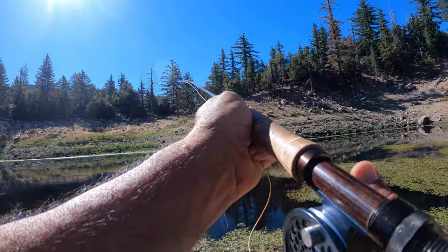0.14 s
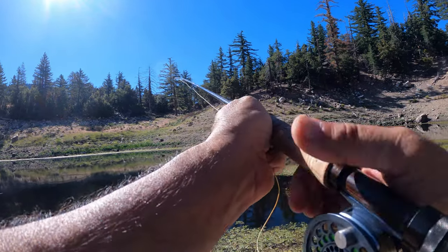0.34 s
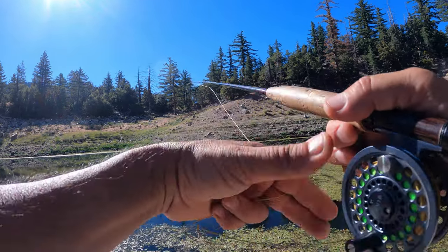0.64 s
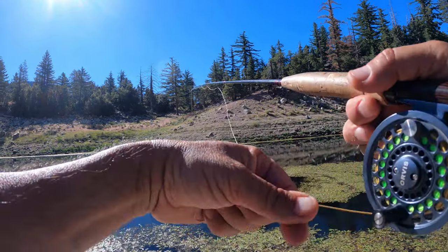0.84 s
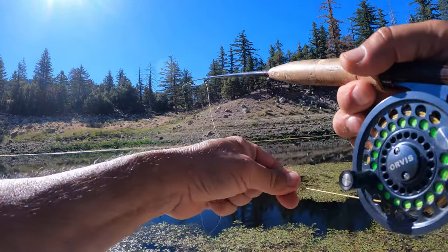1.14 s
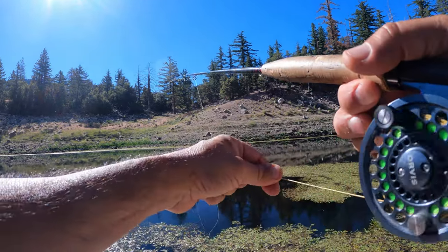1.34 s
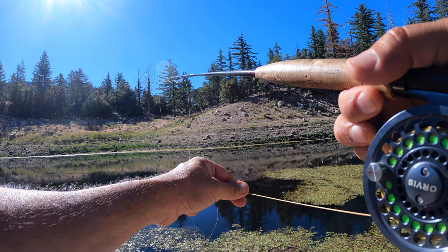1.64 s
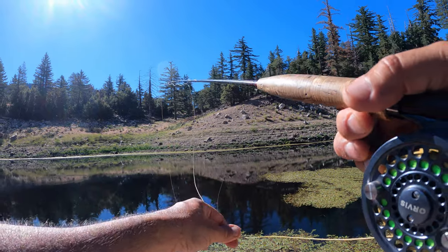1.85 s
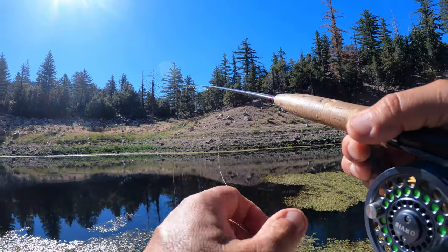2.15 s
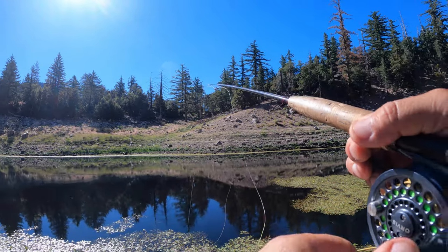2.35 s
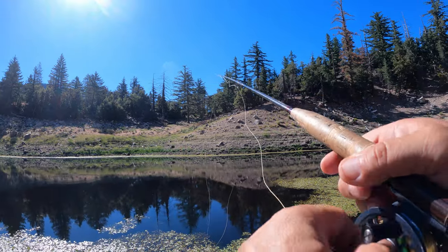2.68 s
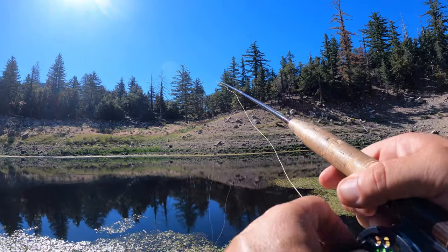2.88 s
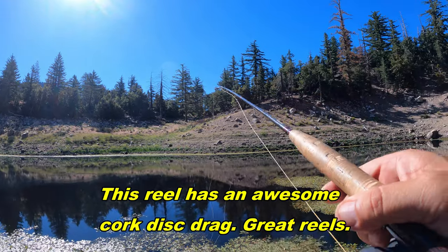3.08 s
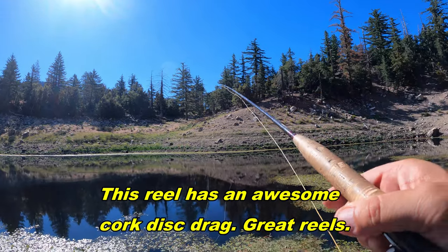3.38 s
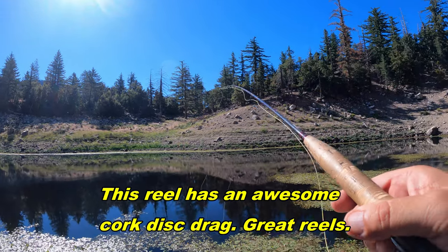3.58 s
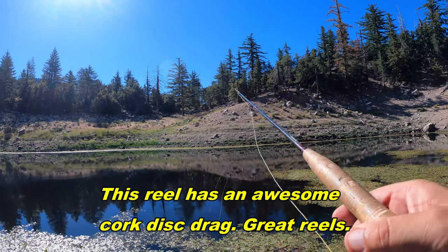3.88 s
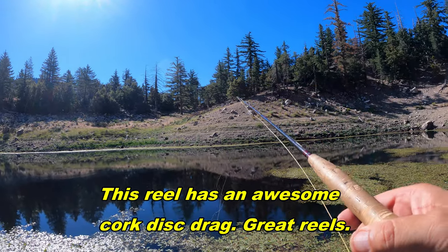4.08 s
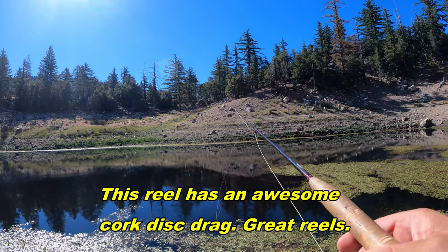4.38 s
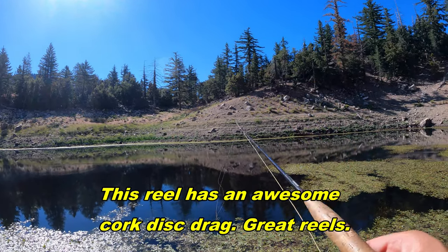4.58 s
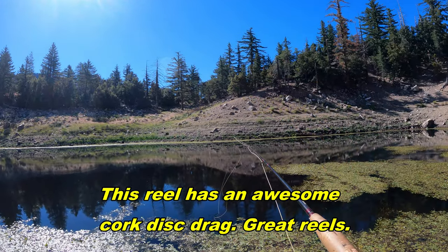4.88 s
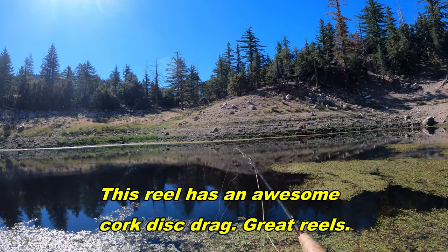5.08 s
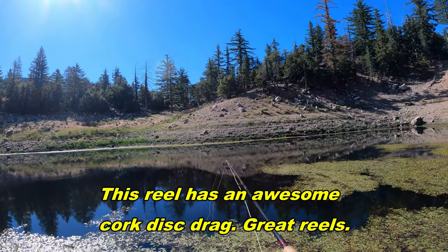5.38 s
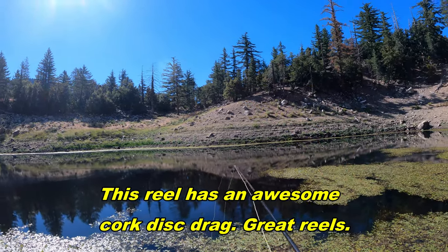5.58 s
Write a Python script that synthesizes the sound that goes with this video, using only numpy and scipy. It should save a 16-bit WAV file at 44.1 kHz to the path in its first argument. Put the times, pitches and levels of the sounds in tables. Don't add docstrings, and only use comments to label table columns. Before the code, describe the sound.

Fly reel clicks singly as line is pulled off, then buzzes in a fast surging ratchet as it is wound, with knocks and thumps.

```python
import sys
import numpy as np
from scipy import signal
from scipy.fft import rfft, irfft, next_fast_len
from scipy.io import wavfile
from scipy.ndimage import uniform_filter1d, map_coordinates

SR = 44100
rng = np.random.default_rng(int(sys.argv[2]) if len(sys.argv) > 2 else 0)


def volts_from_db(level):
    exponent = np.asarray(level, float) / 20
    return 10 ** exponent


def generate_wav(signal):
    frames = np.transpose(np.atleast_2d(signal))
    scaled = np.clip(frames, -1, 1) * 32767
    pcm = np.round(scaled).astype(np.int16)
    wavfile.write(sys.argv[1], SR, pcm)


N = 252693

# (time [s], peak level [dB], ring [Hz])
TAKE_UP = [(2.609, -19, 5450), (2.6536, -16, 5510), (2.7088, -19, 5920), (2.7646, -16, 5880),
           (2.8118, -16, 5860), (2.8454, -20, 5860), (2.8858, -17, 5660), (3.0553, -16, 5880),
           (3.086, -13, 5750), (3.1128, -15, 5710), (3.1383, -13, 5660), (3.1632, -14, 5280),
           (3.1925, -18, 5320), (3.2209, -21, 5600)]


def unit(x):
    return x / np.sqrt(np.mean(x ** 2) + 1e-20)


def curves(rows):
    s, *cols = np.transpose(rows)
    return [np.interp(np.arange(N) / SR, s, c) for c in cols]


def wobble(rate):
    knots = rng.standard_normal(int(N * rate / SR) + 4)
    return map_coordinates(knots, [np.arange(N) * rate / SR])


def along(points, hz):
    f, v = np.transpose(points)
    return np.interp(np.log(hz + 1), np.log(f + 1), v)


def filtered(x, response):
    size = next_fast_len(N + 8192)
    f = np.fft.rfftfreq(size, 1 / SR)
    return irfft(rfft(x, size) * response(f), size)[..., :N]


def peak(f, hz, width):
    return 1j * f * width / (hz * hz - f * f + 1j * f * width)


def swell(s, rise, fall, db, order):
    t = np.arange(N) / SR - s
    return volts_from_db(db - 20 * np.maximum(t / fall, -t / rise) ** order)


def rush(spectrum, alike, grains_db, streak_db, pan_db):
    z = signal.stft(rng.standard_normal((2, N)), nperseg=512)[2]
    field = uniform_filter1d(rng.standard_normal(z.shape[1:]), size=2, axis=0)
    field = uniform_filter1d(field, size=12, axis=1)
    streaks = signal.istft(z * volts_from_db(streak_db * unit(field)), nperseg=512)[1][:, :N]
    lowest, highest = spectrum[0][0], spectrum[-1][0]
    mid, side = filtered(streaks * volts_from_db(grains_db),
                         lambda f: volts_from_db(along(spectrum, f)) * (f > lowest) * (f < highest))
    turn = np.arccos(np.clip(alike, -1, 1)) / 2
    stereo = np.cos(turn) * mid + np.outer([1, -1], np.sin(turn) * side)
    return unit(stereo) * volts_from_db([[pan_db / 2], [-pan_db / 2]])


def strikes(rows, ring_width, bodies, chatter_s, clean, apart, tail_db, tail_s, scatter_db, pan_db):
    size = 2048
    out = np.zeros((2, N + size))
    f, t = np.fft.rfftfreq(size, 1 / SR), np.arange(size) / SR
    levels = zip(*[body_levels for _, body_levels in bodies])
    for (s, db, hz, *_), body_db in zip(rows, levels):
        chatter = rng.standard_normal((3, size)) ** 3 * np.sqrt(t) * np.exp(-t / chatter_s)
        taps = rfft(chatter)
        shared, *own = taps / np.sqrt(uniform_filter1d(np.abs(taps) ** 2, size=70))
        blow = shared + apart * (f / 10000) ** 2 * np.array(own)
        ring = peak(f, hz, ring_width) ** 3 * (clean + (1 - clean) * blow)
        for (modes, _), level in zip(bodies, body_db):
            for k, (centre, width, mode_db) in enumerate(modes):
                gain = volts_from_db(level + mode_db + scatter_db * rng.standard_normal())
                ring = ring + (-1) ** k * gain * peak(f, centre, width) ** 2 * blow
        tail = volts_from_db(tail_db - 60 * t / tail_s) * rng.standard_normal((2, size))
        sound = irfft(ring * (1 + rfft(tail)), size)[:, :size // 2]
        out[:, round(s * SR):][:, :size // 2] += sound / np.abs(sound).max() * volts_from_db(db)
    return out[:, :N] * volts_from_db([[pan_db / 2], [-pan_db / 2]])


def lake():
    # (frequency [Hz], density [dB per Hz])
    hum_colour = [(35, -40), (60, -22.5), (113, -24.5), (144, -7), (204, 0), (314, -10.5), (477, -11),
                  (807, -24.5), (924, -22), (1420, -19), (1500, -20.5), (1950, -30), (3300, -120)]
    # (time [s], level [dB])
    hum_level = [(0, -61.5), (1.5, -61.5), (2.2, -58), (2.6, -62), (4.2, -62.5), (5.0, -64.5), (5.2, -61),
                 (5.73, -60)]
    # (peak time [s], rise [s per 20 dB], fall [s per 20 dB], level [dB])
    jolt_rows = [
        (0, .1, 0.2, -49.5),
        (.389, 0.19, .18, -64),
        (2.709, .5, 3, -80.5),
        (3.637, 0.1, 0.19, -43),
        (4.136, .11, .1, -50.5),
        (4.6, .2, 0.5, -70),
        (4.994, 0.074, .15, -58.5),
        (5.727, 0.33, .1, -76),
    ]
    # (frequency [Hz], density [dB per Hz])
    thump_colour = [(8, 5), (25, -1), (45, -6), (70, -18.5), (120, -30)]
    still_db = -94

    hum = rush(hum_colour, 0.62, 1.98 * wobble(6.09), streak_db=1.45, pan_db=-1.5)
    jolts = volts_from_db(still_db) + sum(swell(*row, order=1) for row in jolt_rows)
    thumps = rush(thump_colour, 0.95, 1.5 * wobble(12), streak_db=0, pan_db=-3.6)
    return volts_from_db(curves(hum_level)[0]) * hum + jolts * thumps


def ticks():
    # (time [s], peak level [dB], ring [Hz], knock over the ring [dB])
    metal = [(0.0256, -22, 6360, -12), (0.0343, -22.5, 5150, -10.5), (0.4542, -55, 5300, -21),
             (0.491, -49, 3400, -4), (0.5138, -48.5, 5250, -7), (1.0594, -35, 5100, -17.5),
             (1.0594, -36, 11500, -27), (1.075, -54, 5770, -20), (1.081, -38, 5560, -18),
             (1.4898, -36, 5700, -20), (1.682, -45, 6070, -3), (1.933, -47.5, 8800, -20),
             (2.3802, -21, 5170, -10.5), (2.3802, -26.5, 8700, 5), (2.5936, -34, 5900, -11),
             (2.7252, -43, 4480, -9), (2.9135, -25.5, 4530, -7), (2.9403, -30.5, 6550, -8.5),
             (4.8763, -30, 4730, -18), (4.8872, -29.5, 6800, -16.5), (5.0486, -36, 5840, -10),
             (5.2961, -40, 4800, -2)]
    # (time [s], peak level [dB], ring [Hz], knock over the ring [dB])
    cork = [(0.562, -43.5, 5650, -11), (1.778, -52, 5860, -13), (2.5194, -44, 5640, 2),
            (2.702, -29.5, 6230, -7.5), (2.8326, -40, 4700, 6), (2.8583, -37, 4360, -13),
            (3.008, -35, 6270, -3), (3.0173, -33, 3850, -10.5), (3.034, -29, 6450, -15),
            (4.8254, -34.5, 3600, 4), (5.096, -35.5, 4800, -11), (5.1232, -39, 4860, 0),
            (5.1373, -26.5, 4960, -9), (5.1426, -37, 4720, 2), (5.3244, -45, 5740, -11)]
    # (time [s], peak level [dB])
    crackle = [(1.675, -50), (1.7295, -54), (1.9087, -49), (1.957, -52), (1.9866, -52), (2.042, -57.5),
               (4.919, -47), (4.9636, -45), (4.998, -48.5), (5.0789, -46), (5.158, -46), (5.176, -50),
               (5.2056, -51), (5.218, -50), (5.236, -46.5), (5.281, -47), (5.351, -52)]
    # (frequency [Hz], width [Hz], level [dB])
    grip = [(1216, 520, -12.5), (1770, 400, -3.5), (2740, 720, -6.5), (3240, 210, -3.5), (4480, 720, -3.5)]
    # (frequency [Hz], width [Hz], level [dB])
    rim = [(7080, 1100, -7.5), (9000, 1400, -10.5), (11500, 3400, -19.5), (13600, 1000, -35)]

    zip_start_s, zip_gap_s, zip_shrinks = 1.8232, 0.01, 0.8
    zipping = [(zip_start_s + zip_gap_s * k * zip_shrinks ** k, -45.5, 5300, -9) for k in range(7)]
    flicks = [(s, db, 5300, -9) for s, db in crackle]
    bright = metal + zipping
    rows = bright + cork + flicks
    knock_db = np.transpose(rows)[-1] + 2.9
    sparkle_db = np.repeat([-6.5, -20, -14], [len(bright), len(cork), len(flicks)])
    return volts_from_db(5.0) * strikes(rows, 1890, [(grip, knock_db), (rim, sparkle_db)],
                              chatter_s=0.00055, clean=0.33, apart=0.3, tail_db=-25.5, tail_s=0.025,
                              scatter_db=1.5, pan_db=-3.5)


def slides():
    # (peak
    # time [s], rise [s per 20 dB], fall [s per 20 dB], level [dB], fine hiss over it [dB])
    hand_slides = [(0.037, 0.054, 0.033, -56.0, -8.7), (0.173, 0.164, 0.103, -72.9, -6.7),
                   (0.365, 0.063, 0.063, -63.7, -0.1), (0.566, 0.153, 0.212, -62.2, -4.2),
                   (0.669, 0.097, 0.161, -46.1, -16.5), (0.789, 0.089, 0.064, -46.5, -17.6),
                   (0.926, 0.027, 0.062, -66.5, -0.6), (1.012, 0.11, 0.107, -55.0, -16.2),
                   (1.146, 0.243, 0.062, -62.9, -1.9), (1.289, 0.173, 0.253, -55.3, -9.2),
                   (1.507, 0.289, 0.256, -57.0, -1.9), (1.726, 0.373, 0.125, -67.9, -5.1),
                   (1.846, 0.035, 0.094, -62.8, -11.3), (1.935, 0.105, 0.103, -52.8, -15.7),
                   (2.053, 0.045, 0.373, -67.6, -18.3), (2.151, 0.079, 0.155, -55.2, -17.3),
                   (2.382, 0.096, 0.064, -54.4, -26.0),
                   (2.565, 0.184, 0.091, -49.1, -24.3), (2.702, 0.201, 0.034, -47.6, -10.1),
                   (2.854, 0.234, 0.021, -55.1, -12.5), (2.929, 0.072, 0.06, -54.1, -12.8),
                   (3.024, 0.05, 0.363, -56.8, -13.5), (4.894, 0.597, 0.071, -54.1, -14.7),
                   (5.0, 0.089, 0.052, -56.9, -18.2), (5.05, 0.022, 0.069, -54.7, -13.1),
                   (5.141, 0.051, 0.053, -51.8, -15.8), (5.229, 0.069, 0.079, -59.6, -16.8),
                   (5.295, 0.023, 0.115, -57.5, -15.6), (5.384, 0.045, 0.061, -53.9, -3.0),
                   (5.534, 0.133, 0.17, -47.8, -13.1), (5.744, 0.094, 0.189, -48.2, -5.3)]
    rest_db = [-83.5, -80, -89]

    rows = hand_slides
    fine_db = np.transpose(rows)[-1]
    low_db = -9.5 - 0.23 * fine_db
    shares = volts_from_db([0 * fine_db, low_db, fine_db])
    swells = np.array([swell(*row[:-1], order=2) for row in rows])
    power = shares ** 2 @ swells ** 2
    return np.sqrt(power + volts_from_db(rest_db)[:, None] ** 2)


def wound():
    # (time [s], surge [ms], lag [ms], peak level [dB])
    half_turns = [(3.2445, -3.0, 3.8, -17.5), (3.3861, -5.1, 3.8, -17.3), (3.5099, -7.0, 1.8, -17.0),
                  (3.63, -2.6, -3.0, -17.0), (3.739, -3.6, 2.3, -18.1), (3.8535, -3.2, -2.3, -16.8),
                  (3.9653, -3.2, 1.1, -18.8), (4.0846, -3.1, 0.2, -17.1), (4.1979, -4.2, 1.0, -17.8),
                  (4.3222, -2.1, 1.1, -17.5), (4.4354, -3.4, 1.7, -16.9), (4.5543, -2.3, -0.2, -18.0),
                  (4.6605, -4.7, -0.8, -17.4), (4.7799, -0.2, -4.2, -21.5), (4.8932, 0, 0, -60)]
    # (level [dB], ring [Hz])
    worn_teeth = [(2, 5430), (2.8, 5600), (2, 5580), (-3.5, 5450), (-0.5, 5440), (1.6, 5500), (0, 5520),
                  (-0.8, 5480), (-1.5, 5800), (1.3, 5320), (3.5, 5630), (1.5, 5440), (0, 5540), (0.5, 5200),
                  (-0.7, 5440), (-1, 5220.0)]

    s, surge_ms, lag_ms, db = np.transpose(half_turns)
    tooth = np.arange(8 * (len(s) - 1) - 1)
    half = tooth // 8
    angle = 2 * np.pi * (tooth % 8) / 8
    even = np.interp(tooth / 8, np.arange(len(s)), s)
    uneven_ms = surge_ms[half] * np.sin(angle) + lag_ms[half] * (1 - np.cos(angle))
    tooth_db, hz = np.array(worn_teeth)[tooth % 16].T
    return np.r_[TAKE_UP, np.c_[even + uneven_ms / 1000, db[half] + tooth_db, hz]]


def rubbing():
    steady = 3.06, 4.895
    # (time [s], level [dB])
    line_tension = [(3.06, -44.5), (3.243, -37), (3.437, -42.5), (3.73, -38), (3.87, -42), (4.27, -42.5),
                    (4.76, -47), (4.85, -41), (4.895, -47)]
    # (frequency [Hz], density [dB per Hz])
    skin_colour = [(2400, -14), (3100, -6.5), (3700, -2.5), (4050, 0), (4500, -1.5), (5300, -5),
                   (6500, -7.5), (8000, -26), (10000, -27.5)]
    # (frequency [Hz], density [dB per Hz])
    spool_colour = [(2500, -12.5), (3400, -8), (4400, -2), (5000, -5), (5900, -8), (6400, -4.5),
                    (7200, -26), (9500, -47)]
    # (frequency [Hz], density [dB per Hz])
    low_colour = [(700, -28), (1050, -9.5), (1500, -1), (1750, -5.5), (1950, 2), (2400, -2), (2900, -12),
                  (3600, -2)]
    # (frequency [Hz], density [dB per Hz])
    fine_colour = [(5500, -31), (7000, -3), (7600, 0.5), (8400, -4), (12400, -12.5), (13600, -22.5),
                   (15500, -34), (16300, -65)]

    t, teeth = np.arange(N) / SR, wound()[:, 0]
    winding = (t > steady[0]) & (t < steady[1])
    rate = np.interp(t - 0.012, (teeth[1:] + teeth[:-1]) / 2, 1 / np.diff(teeth))
    speed = winding * np.log2(rate / 72)
    speed = np.minimum(speed, 0.091)
    late_db = -17 * np.clip(1 - (t - steady[0]) / 0.19, 0, 1)
    line_db = np.array([13 * speed, -9 + 11 * speed, -11.5 + late_db + 14 * speed])
    line = winding * volts_from_db(curves(line_tension)[0] + line_db)
    hands = slides()

    catches = (1.64 + 1.8 * winding) * np.minimum(wobble(420), 2)
    skin = rush(skin_colour, 0.89, catches + 1.5 * wobble(400), streak_db=4.0, pan_db=-3.5)
    spool = rush(spool_colour, 0.86, catches + 1.8 * wobble(370), streak_db=3.0, pan_db=-5.5)
    low = rush(low_colour, 0.76, 0.83 * catches + 0.96 * wobble(200), streak_db=3.0, pan_db=-1)
    fine = rush(fine_colour, 0.69, catches + 3.0 * wobble(600), streak_db=3.5, pan_db=-3.0)
    return hands[0] * skin + line[0] * spool + (hands[1] + line[1]) * low + (hands[2] + line[2]) * fine


def pawl():
    # (time [s], peak level [dB], ring [Hz])
    pull_drops = [(1.1471, -35, 6180), (1.2407, -29, 4050), (1.3068, -23, 5810), (1.3562, -26, 5730),
                  (1.3937, -22, 5810), (1.4331, -25, 4970), (1.4696, -26, 4540), (1.5072, -22, 4390),
                  (1.5456, -17, 5340), (1.5855, -16.5, 6100), (1.6307, -18, 5340)]
    # (frequency [Hz], width [Hz], level [dB])
    side_on = [(1760, 250, -22), (2780, 610, -36), (3910, 640, -10.5), (4800, 1400, -16.5),
               (5840, 590, -9.5), (8240, 1400, -26), (9760, 1600, -22), (11660, 590, -18),
               (13800, 930, -31)]
    # (frequency [Hz], width [Hz], level [dB])
    edge_on = [(1650, 130, -28.5), (2480, 350, -44), (3600, 1070, -23.5), (4600, 260, -21),
               (6660, 1020, -19.5), (8870, 2340, -29), (11170, 1730, -31.5), (12450, 1100, -36),
               (14200, 1700, -43)]

    pulled = strikes(pull_drops, 1470, [(side_on, np.full(len(pull_drops), 3.0))],
                     chatter_s=0.00021, clean=0.74, apart=0.31, tail_db=-29.5, tail_s=0.016,
                     scatter_db=1.5, pan_db=-4.0)
    drops = wound()
    steady = drops[len(TAKE_UP):]
    steady[:, 1:] += rng.standard_normal((len(steady), 2)) * [0.8, 140]
    winding = strikes(drops, 1380, [(edge_on, np.full(len(drops), 3.0))],
                      chatter_s=0.00058, clean=0.89, apart=0.56, tail_db=-51, tail_s=0.022,
                      scatter_db=2.5, pan_db=-4.0)
    return volts_from_db(0.5) * pulled + volts_from_db(0.5) * winding


def squeaks():
    # (time [s], half length [s], frequency [Hz], width [Hz], level [dB])
    sung = [
        (1.862, 0.027, 320, 517, -56),
        (2.502, 0.068, 2400, 120, -62.5),
        (3.665, 0.022, 2240, 110, -40),
        (4.834, 0.0044, 1550, 256, -42.5),
    ]
    t, out = np.arange(N) / SR, np.zeros(N)
    for s, half, hz, width, db in sung:
        tone = unit(filtered(rng.standard_normal(N), lambda f: peak(f, hz, width) ** 2))
        out += volts_from_db(db) * np.exp(-((t - s) / half) ** 2) * tone
    return out * volts_from_db([[-1.5], [1.5]])


def scene():
    return lake() + ticks() + rubbing() + pawl() + squeaks()


def band_limit(x):
    return signal.sosfilt(signal.butter(12, 16810, fs=SR, output="sos"), x)


def record(dry):
    # (frequency [Hz], phase [radians])
    port_lead = [(30, 0.3), (300, -0.51), (1300, -0.073), (3000, -1.12), (4200, -0.31), (6500, -0.31),
                 (9000, -0.34), (16000, 0.33)]
    # (frequency [Hz], left minus right [dB])
    shadow = [(500, -0.5), (2400, -1.5), (6000, 1.6), (13000, 4)]
    # (frequency [Hz], level [dB])
    treble = [(15500, 0.5), (16500, -12), (16800, -60)]

    half = np.array([[.5], [-.5]])
    mix = filtered(dry, lambda f: volts_from_db(along(treble, f) + half * along(shadow, f))
                   * np.exp(1j * half * along(port_lead, f)))
    return band_limit(mix)


dry = scene()
out = record(dry)
generate_wav(out)
```